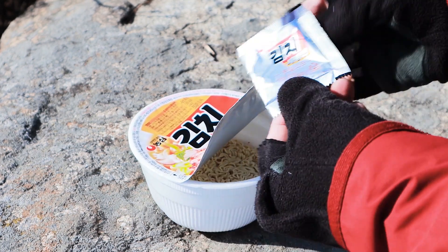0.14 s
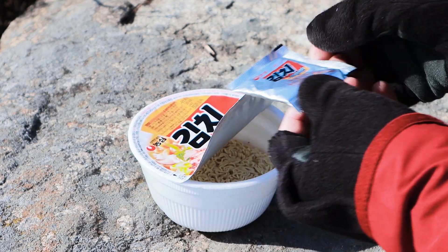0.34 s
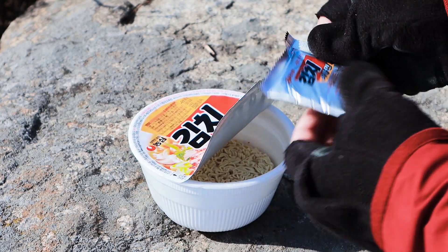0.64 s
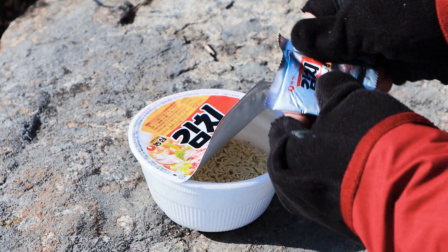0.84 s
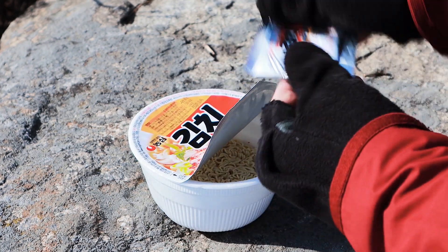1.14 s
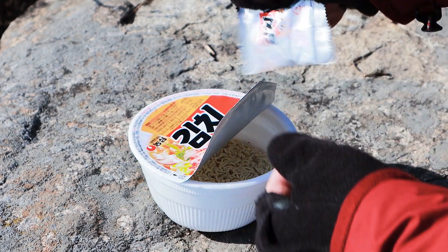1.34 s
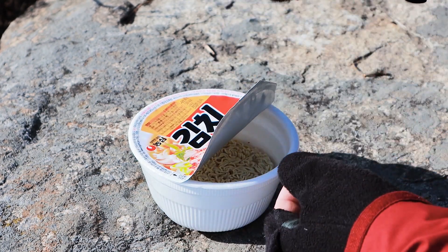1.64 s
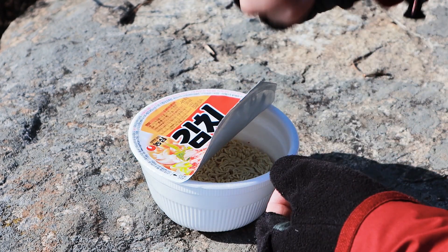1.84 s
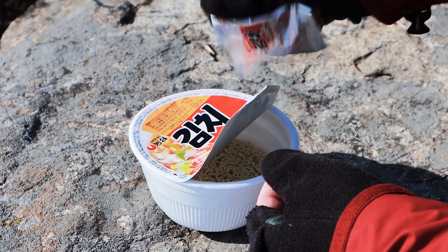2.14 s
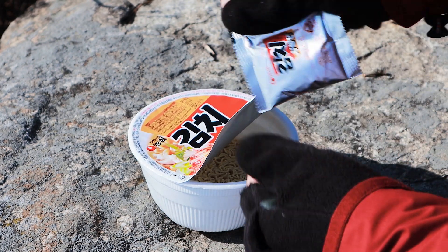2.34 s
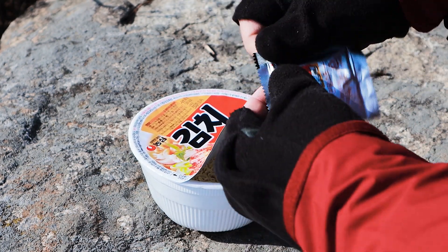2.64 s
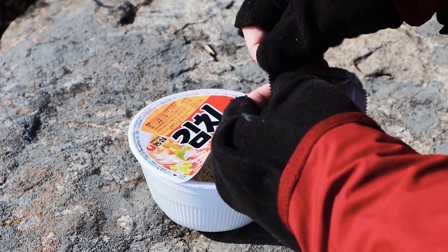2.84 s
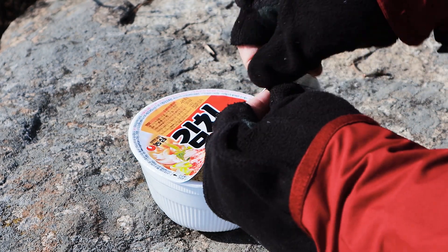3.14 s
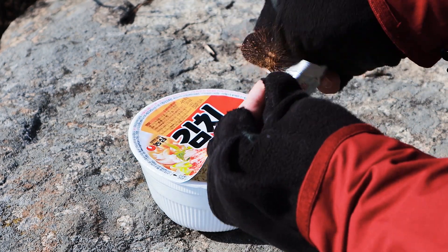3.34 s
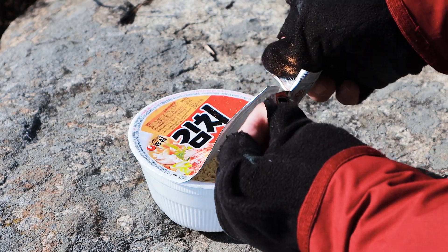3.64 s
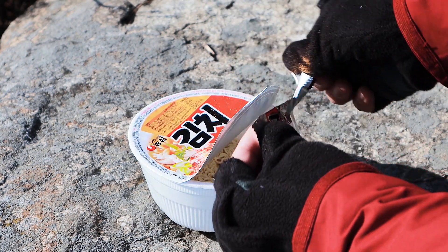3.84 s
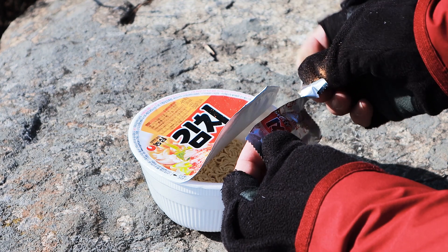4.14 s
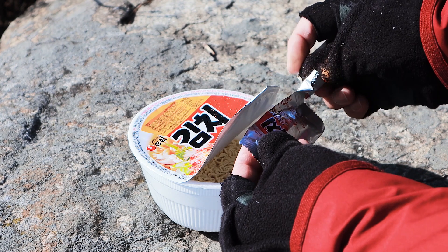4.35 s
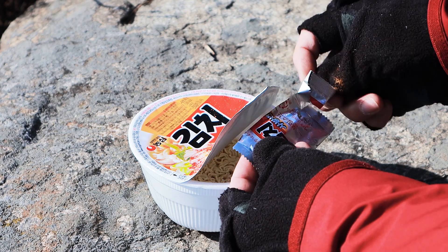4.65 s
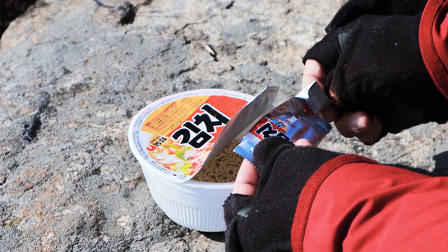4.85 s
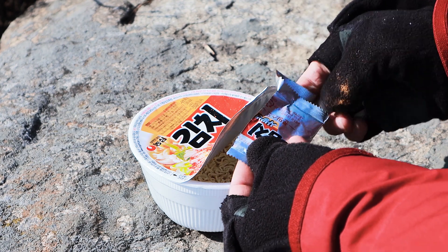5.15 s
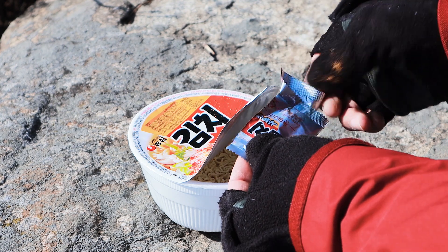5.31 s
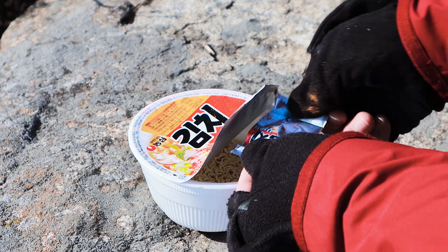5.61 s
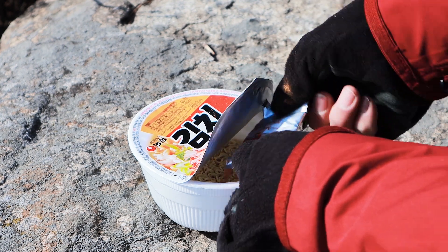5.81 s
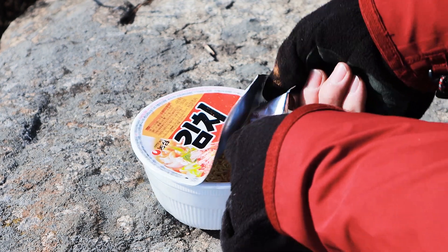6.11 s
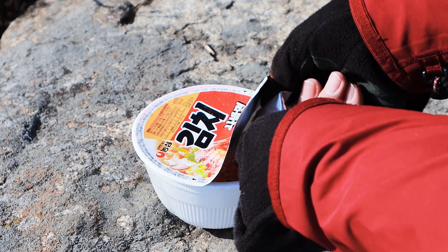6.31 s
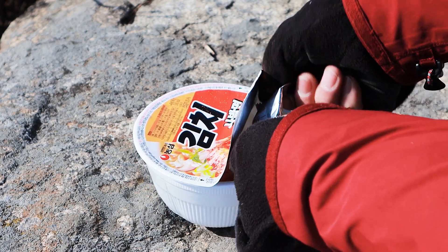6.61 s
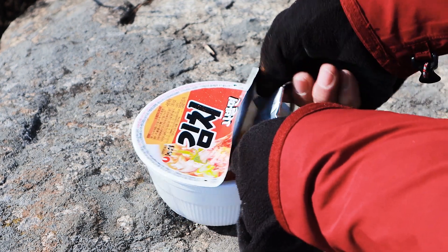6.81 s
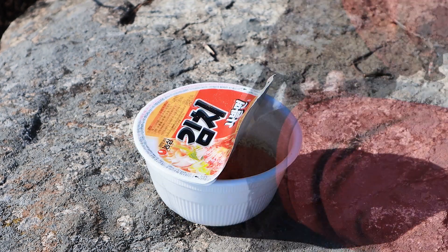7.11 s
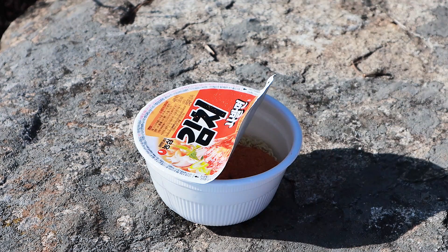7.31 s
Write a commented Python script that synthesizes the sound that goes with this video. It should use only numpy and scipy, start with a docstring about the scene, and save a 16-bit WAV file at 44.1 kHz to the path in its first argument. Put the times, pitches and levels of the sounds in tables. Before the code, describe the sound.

Foil sachet crinkles close up, is shaken in sharp powdery slaps, tears in small snaps, then powder hisses into a hollow foam cup outdoors.

```python
"""Foil crinkles close to the microphone: gloved hands handle a seasoning sachet over a foam noodle cup on open rock.
Flipping creases crackle and snap, the powder slaps inside as the sachet is shaken, and its top tears off in
small snaps. Powder then hisses along the foil and rings the cup's resonances. Gusts of low wind noise, a faint
outdoor hiss and one faint falling whistle lie under it. The sounds are made from shaped noise, clicks and
soft pushes, with a sine for the whistle."""
import sys
import numpy as np
from scipy import signal
from scipy.fft import rfft, irfft, next_fast_len
from scipy.io import wavfile
from scipy.ndimage import uniform_filter1d

SR = 44100
rng = np.random.default_rng(int(sys.argv[2]) if len(sys.argv) > 2 else 0)


def store_pcm(level_fs):
    """Save levels as 16-bit WAV."""
    pcm = np.round(np.clip(level_fs, -1, 1) * 32767).astype(np.int16)
    wavfile.write(sys.argv[1], SR, np.atleast_2d(pcm).T)


N = 329427  # samples
TIME = np.arange(N) / SR  # seconds
TOP_HZ = 15900  # upper limit of filter tuning and of the recorder

# The colour of the sachet's crackle and slap beside the rock: a low hump near 240 Hz, with notches near 2.1,
# 4.9 and 6.8 kHz. Each row: frequency in Hz, relative level in dB.
SACHET_SPECTRUM = [(120, -13), (240, 8.5), (400, 4.5), (650, 2.5), (1060, -4), (1520, -0.5), (2060, -7),
                   (2900, -0.5), (4240, -3), (4860, -9.5), (5680, -1.5), (6800, -13.5), (7800, -5),
                   (10000, -2.5), (13500, -6), (16000, -10)]
# The colour of glove rub and fine crinkles. Each row: frequency in Hz, relative level in dB.
RUSTLE_SPECTRUM = [(200, -9), (700, -3), (1500, 3.5), (2100, -4), (3000, -1.5), (4200, -1), (4900, -11),
                   (5800, -1.5), (7000, -9.5), (8000, -4.5), (9800, 0.5), (12500, -8.5), (16000, -14)]


def undb(db):
    """Decibels to gain."""
    return 10 ** (np.asarray(db) / 20)


def unit(x):
    """Scale to rms 1."""
    return x / np.sqrt(np.mean(x ** 2) + 1e-20)


def curve(rows):
    """Gain over time, from rows of seconds and dB."""
    return undb(np.interp(TIME, *np.transpose(rows)))


def add(out, start_s, x):
    """Mix a short sound in at a given time; whatever falls past the end is dropped."""
    i = max(int(start_s * SR), 0)
    out[i:i + len(x)] += x[:max(N - i, 0)]


def colour(x, points):
    """Shape a sound by a spectrum in Hz and dB, straight over log frequency; rms 1."""
    hz, db = np.transpose(points)
    n = next_fast_len(len(x), real=True)
    f = np.fft.rfftfreq(n, 1 / SR) + 1  # the 1 Hz offset avoids log(0)
    gain = undb(np.interp(np.log(f), np.log(hz), db))
    return unit(irfft(rfft(x, n) * gain, n)[:len(x)])


def resonance(x, hz, q):
    """Two-pole band-pass with gain 1 at the centre; Q is never below 0.1."""
    w = 2 * np.pi * min(hz, TOP_HZ) / SR
    a = np.sin(w) / (2 * max(q, .1))
    return signal.lfilter([a, 0, -a], [1 + a, -2 * np.cos(w), 1 - a], x)


def cut(x, hz, kind, order=2):
    """Smooth high-pass or low-pass."""
    return signal.sosfilt(signal.butter(order, min(hz, TOP_HZ), kind, fs=SR, output="sos"), x)


def walk(rate):
    """Smooth random wander through about `rate` new values a second; rms 1."""
    k = max(int(SR / rate), 1)
    steps = np.repeat(rng.standard_normal(N // k + 1), k)[:N]
    return unit(uniform_filter1d(steps, k))


def grains(rate, spread_db):
    """Random tiny impacts, about `rate` a second, of unequal size and either sign; rms 1."""
    hit = rng.random(N) < rate / SR
    sign = np.sign(rng.standard_normal(N))
    size = undb(spread_db * np.clip(rng.standard_normal(N), -2, 2))
    return unit(hit * sign * size)


def gesture(start_s, length_s, attack_s, release_s):
    """The samples around one hand movement, and its exponential attack, hold and release over them."""
    first = max(int(start_s * SR) - SR // 8, 0)
    span = slice(first, int((start_s + length_s) * SR) + SR // 5)
    t = TIME[span] - start_s
    return span, np.exp(np.minimum(t, 0) / attack_s - np.maximum(t - length_s, 0) / release_s)


def buckle(decay_s, rise_s=0.00006, tail_s=0.0066, tail_db=-19, crack=0.65):
    """One crease flips: a crack, a quick flutter of the film and a weak tail off hands and rock."""
    t = TIME[:SR // 40]
    flutter = np.exp(-t / decay_s) + undb(tail_db) * np.exp(-t / tail_s)
    x = np.tanh(rng.standard_normal(len(t))) * flutter * (1 - np.exp(-t / rise_s))
    x[SR // 4000] += crack  # a single-sample click, 0.25 ms in
    return x / np.linalg.norm(x)


def crackle(rate, spread_db, decay_s, low_hz, high_hz, q, count=200):
    """A set of facets, each with its own pitch, flipping at uneven gaps with uneven force; rms 1."""
    facets = [unit(resonance(buckle(decay_s), hz, q)) for hz in np.geomspace(low_hz, high_hz, count)]
    times = np.cumsum(rng.gamma(2, 1 / (2 * rate), int(rate * N / SR)))
    sizes = undb(spread_db * rng.random(len(times)) ** 2)  # squaring makes strong flips rarer
    choices = rng.integers(count, size=len(times))
    out = np.zeros(N)
    for at_s, size, facet in zip(times, sizes, choices):
        add(out, at_s, size * facets[facet])
    return unit(out)


def outdoors(wind_db=-1, gust_db=2.0, calm_db=-71, waver_db=1.2):
    """Wind buffets the microphone in gusts of low noise over a slowly wavering distant hiss."""
    # Gusts at the microphone. Each row: peak in seconds, level in dB before wind_db,
    # time constant of swell and fade in seconds.
    gusts = [(.89, -52.5, 0.26), (1.36, -57, 0.22), (2.05, -57, 0.092), (2.8, -59, 0.23), (3.32, -49, 0.14),
             (3.68, -55, 0.13), (4.0, -55.5, 0.13), (4.89, -49, 0.26), (5.19, -48.5, 0.33),
             (5.72, -53, 0.28), (6.7, -62, .15), (7.4, -68, .3)]
    # The open-air hiss. Each row: time in seconds, level in dB before the waver.
    air_level = [(0, -58.5), (2.5, -63.5), (3.5, -60), (4.5, -60.5), (5.4, -63.5), (6.85, -57.5),
                 (7.1, -50.5), (7.3, -50), (7.47, -45.5)]
    # Colour of hiss, then of wind. Each row: frequency in Hz, relative level in dB.
    air_spectrum = [(100, 4.5), (250, 2), (600, 2), (1000, -5.5), (1500, -2.5), (2100, -8), (4000, -9),
                    (7000, -11.5), (10000, -9), (16000, -17)]
    wind_spectrum = [(20, -1), (45, -1.5), (90, -6), (160, -13.5), (300, -23.5), (800, -76)]
    eddies, waver = walk(20), walk(6)
    force = undb(calm_db)
    for at_s, db, fade_s in gusts:
        gust = undb(db) * np.exp(-np.abs(TIME - at_s) / fade_s)
        force = np.maximum(force, gust)  # the strongest gust counts
    wind = colour(rng.standard_normal(N), wind_spectrum) * force * undb(wind_db + gust_db * eddies)
    air = colour(rng.standard_normal(N), air_spectrum) * curve(air_level) * undb(waver_db * waver)
    return wind + air


def whistles(decay_s=0.092):
    """A faint gliding whistle, like a distant bird: a decaying sine whose pitch slides evenly."""
    # Glides; a row that starts past the end stays silent. Each row: start in seconds, length in seconds,
    # start pitch in Hz, end pitch in Hz, level in dB before the decay.
    glides = [(7.115, .093, 1490, 1240, -50), (8.5, .075, 7200, 10750, -49)]
    out = np.zeros(N)
    for at_s, length_s, start_hz, end_hz, db in glides:
        t = TIME[:int(length_s * SR)]
        pitch = np.linspace(start_hz, end_hz, len(t))
        tone = unit(np.sin(2 * np.pi * np.cumsum(pitch) / SR))
        fade = np.exp(-t / decay_s) * signal.windows.tukey(len(t), .15)
        add(out, at_s, undb(db) * tone * fade)
    return out


def cup(x):
    """The air and wall of the cup ring with whatever falls into it; rms 1."""
    # Resonances under the half-open lid. Each row: frequency in Hz, width in Hz, relative level in dB.
    modes = [(230, 45, -9), (320, 50, -8), (456, 42, 0), (635, 65, 0), (705, 65, -1), (890, 50, -1),
             (1010, 60, -6), (1260, 90, 1), (1530, 55, 0), (1750, 90, -4), (2250, 200, -13),
             (2900, 100, -9), (3700, 250, -11)]
    return unit(sum(undb(db) * resonance(x, hz, hz / width) for hz, width, db in modes))


def knocks(contact_s=0.0019, lowest_hz=420, grit_db=-16):
    """The sachet bumps the cup with a short soft push and the cup answers with a hollow note."""
    # Blows on the cup. Each row: time in seconds, level in dB over the first 20 ms.
    blows = [(2.044, -26.5), (2.054, -32), (4.362, -55), (5.014, -54), (5.091, -49.5), (5.268, -59.5),
             (5.712, -43), (6.067, -46), (6.222, -42), (6.982, -33), (7.089, -50.5)]
    out, t = np.zeros(N), TIME[:SR // 8]
    for at_s, db in blows:
        grit = undb(grit_db) * rng.standard_normal(len(t)) * np.exp(-t / (10 * contact_s))
        push = np.exp(-t / contact_s) + grit
        note = cup(cut(push, lowest_hz, "high", order=3))
        add(out, at_s, undb(db) * note / np.std(note[:SR // 50]))
    return out


def pouring(cup_db=-2, scrape_db=-6, slide_db=-1, scrape_q=3.5, catch_db=3, dull_hz=3500, lowest_hz=250):
    """Powder hisses along the foil; lumps and the sachet's edge scrape the noodles and ring the cup."""
    # Spills into the cup. Each row: start in seconds, length in seconds, level in dB before the layer balance,
    # relative level of the sliding hiss in dB before slide_db, scrape centre in Hz.
    spills = [(5.701, .025, -36, -5.5, 920), (5.754, 0.079, -39, -4, 895), (5.9, 0.017, -41, -7, 880),
              (5.926, 0.041, -46, -2.5, 805), (5.994, 0.052, -42.5, -1.5, 1080),
              (6.052, 0.091, -51, -3.5, 585), (6.194, 0.0036, -42.5, -25, 1150),
              (6.215, 0.01, -29.5, -3, 1380), (6.248, 0.027, -40, -17, 770), (6.302, 0.157, -55.5, -3, 700),
              (6.515, .022, -44.5, -26, 785), (6.559, 0.032, -40, -3, 1290),
              (6.619, 0.0028, -41.5, -20, 1040), (6.68, 0.0075, -40.5, -21, 1360),
              (6.717, 0.061, -46.5, 0, 1250), (6.847, 0.015, -36, -16, 1090),
              (6.887, 0.046, -31, -11, 1120), (6.972, 0.011, -41, 4.5, 1400)]
    # Colour of the sliding hiss. Each row: frequency in Hz, relative level in dB.
    slide_spectrum = [(800, -23), (2500, -4.5), (4100, -2.5), (5000, -6), (6100, -4), (7100, -7),
                      (8000, -4.5), (9700, -1), (12000, -4.5), (16000, -13)]
    lumps = crackle(rate=220, spread_db=10, decay_s=.001, low_hz=550, high_hz=2100, q=24)
    falling = grains(rate=1100, spread_db=2)
    falling = cut(cut(falling, lowest_hz, "high"), dull_hz, "low")
    slide = crackle(rate=380, spread_db=16, decay_s=.0008, low_hz=2500, high_hz=14000, q=1.5)
    slide = colour(slide, slide_spectrum)
    catch = walk(70)
    spurts = unit(undb(catch_db * np.tanh(catch)))  # the flow catches and lets go
    out = np.zeros(N)
    for start_s, length_s, db, hiss_db, hz in spills:
        span, swell = gesture(start_s, length_s, attack_s=0.0039, release_s=0.012)
        flow = swell * spurts[span]
        patter = cup(falling[span] * flow)  # the cup rings on after each spurt
        scrape = unit(resonance(lumps[span] * flow, hz, scrape_q))
        hiss = unit(slide[span] * flow)
        spill = undb(cup_db) * patter + undb(scrape_db) * scrape + undb(hiss_db + slide_db) * hiss
        out[span] += undb(db) * np.sqrt(np.mean(swell ** 2)) * spill
    return out


def handling(resting_db=-63):
    """How hard the fingers rub the foil and how hard they crease it, as gains: the firmest grip counts."""
    # Grips of the fingers. Each row: start in seconds, length in seconds, rubbing level in dB,
    # creasing level in dB relative to the rubbing, both before the layer balance.
    grips = [(0, .22, -48.5, -1.5), (0.296, 0.019, -58, 7.5), (0.398, 0.051, -53, 1.5),
             (0.547, 0.043, -50, -4.5), (.6, .46, -61, 0), (0.774, 0.22, -56, 5),
             (1.043, 0.22, -53.5, -0.5), (1.301, 0.28, -45, -4), (1.51, .9, -49, -3.5),
             (2.427, 0.069, -43.5, 4.5), (2.513, 0.29, -68, 11.5), (2.685, 0.02, -50, 2),
             (2.944, 0.21, -57.5, -8), (3.187, 0.2, -54.5, 1), (3.346, .135, -50, -1),
             (3.464, 0.17, -54.5, -5.5), (3.83, 0.18, -56, -7.5), (4.19, .05, -57, -2),
             (4.606, 0.091, -64, 2), (4.851, 0.11, -56.5, 2), (4.982, 0.18, -57.5, -10),
             (5.439, 0.08, -55, -22), (5.616, 1.14, -56, -5.5), (6.413, 0.021, -50.5, 10),
             (6.988, 0.064, -54, 2)]
    rubbing = np.full(N, undb(resting_db))  # between grips the glove barely moves on the foil
    creasing = np.zeros(N)
    for start_s, length_s, db, crease_db in grips:
        span, swell = gesture(start_s, length_s, attack_s=0.0087, release_s=0.015)
        rubbing[span] = np.maximum(rubbing[span], undb(db) * swell)
        creasing[span] = np.maximum(creasing[span], undb(db + crease_db) * swell)
    return rubbing, creasing


def rustling(crinkle_db=-1, rub_db=-3, slip_db=2, crease_db=0):
    """Small creases and fine crinkles over the catching, slipping rub of glove on foil."""
    crinkles = crackle(rate=240, spread_db=18, decay_s=.0008, low_hz=1400, high_hz=13000, q=1.5)
    catch = walk(90)
    rub = undb(slip_db * catch) * rng.standard_normal(N)
    creases = crackle(rate=48, spread_db=10, decay_s=.001, low_hz=1900, high_hz=5000, q=.8)
    rubbing, creasing = handling()
    crinkling = np.sqrt(rubbing * creasing)  # crinkles need both sliding and bending
    return (rubbing * undb(rub_db) * colour(rub, RUSTLE_SPECTRUM)
            + crinkling * undb(crinkle_db) * colour(crinkles, RUSTLE_SPECTRUM)
            + creasing * undb(crease_db) * colour(creases, SACHET_SPECTRUM))


def shaking(powder_db=-10, gain_db=-3.5):
    """Powder slams into the end of the sachet and crumples the foil; each throw has its own lowest pitch."""
    # Powder thrown to and fro. Each row: start in seconds, length in seconds, level in dB before gain_db,
    # high-pass corner in Hz.
    throws = [(0.484, 0.0043, -28.5, 518), (0.863, 0.012, -30, 550), (1.357, 0.035, -34.5, 650),
              (1.454, 0.035, -23, 1100), (1.59, 0.028, -24, 1000), (1.652, .034, -17.5, 920),
              (1.781, 0.022, -24, 1120), (1.844, 0.026, -19.5, 950), (1.962, 0.015, -22, 950),
              (2.023, 0.0055, -23.5, 750), (2.041, .018, -20, 350), (2.187, 0.014, -26, 900),
              (2.238, 0.031, -21.5, 850), (2.343, 0.045, -27.5, 546)]
    foil = crackle(rate=420, spread_db=15, decay_s=.0007, low_hz=1200, high_hz=11500, q=2.2)
    powder = unit(resonance(grains(rate=9000, spread_db=3), 3000, .3))
    slap = colour(foil + undb(powder_db) * powder, SACHET_SPECTRUM)
    out = np.zeros(N)
    for start_s, length_s, db, lowest_hz in throws:
        span, swell = gesture(start_s, length_s, attack_s=0.007, release_s=0.0059)
        throw = unit(cut(slap[span] * swell, lowest_hz, "high", order=1))
        out[span] += undb(db + gain_db) * np.sqrt(np.mean(swell ** 2)) * throw
    return out


def snaps(dull_hz=12500, lowest_hz=300, gain_db=0):
    """Single loud creases and steps of the tear; the size of each facet sets its ring."""
    # Creases snapping over. Each row: time in seconds, level in dB over the first 5 ms, ring in Hz,
    # sharpness Q (no unit, held to at least 0.1).
    creases = [(0.0219, -33, 2800, 0.26), (0.0314, -45, 6400, .35), (0.093, -30, 6640, .8),
               (0.1072, -36, 3500, 1.8), (0.119, -40, 3800, 1), (.1478, -34.5, 3430, 2),
               (.171, -30, 9000, 2.7), (0.2075, -34.5, 8800, 0.7), (0.2152, -36.5, 8700, 0.24),
               (0.2681, -42, 3900, 0.14), (0.301, -46, 2600, 1.3), (.415, -39, 2870, 2.7),
               (.421, -34.5, 3880, 0.31), (0.5129, -38, 3930, .7), (.5597, -32, 11000, 0.085),
               (0.5687, -36.5, 2880, 1.9), (.627, -51, 3800, 0.27), (0.743, -43, 2820, 1),
               (0.7998, -41, 2650, 2.2), (.87, -26, 2640, 0.56), (0.8894, -34.5, 3300, .4),
               (.928, -37, 2040, 0.26), (.9659, -34, 2740, 4.5), (1.092, -35, 2250, 3),
               (1.0987, -36.5, 1990, 1.9), (1.142, -32.5, 3150, 1.9), (1.1658, -38, 1890, .7),
               (1.19, -33, 2970, 1.5), (1.2074, -26.5, 2940, 0.89), (1.214, -28.5, 2500, 0.63),
               (1.2213, -32.5, 4500, 0.4), (1.255, -31.5, 3230, .4), (1.3092, -34.5, 4140, 0.67),
               (1.3966, -28, 12000, 1.6), (1.4027, -30, 2870, 1.1), (1.48, -23, 2180, 1.6),
               (1.5236, -29.5, 2640, 0.66), (1.5785, -25, 8200, 0.18), (1.6089, -26.5, 5700, .3),
               (1.6787, -28, 3140, 0.52), (1.739, -31, 2390, 1.6), (1.7576, -29, 2820, 0.52),
               (1.7634, -25, 2660, 1.5), (1.8317, -25.5, 2600, 0.19), (1.9179, -29.5, 2340, 1.2),
               (1.9443, -25, 5340, .3), (2.1381, -29.5, 2470, 1), (2.1557, -29, 2530, 0.091),
               (2.1667, -26.5, 3000, 0.65), (2.4257, -38, 2560, 2), (2.4387, -30.5, 2580, 0.86),
               (2.4496, -29.5, 3040, 0.13), (2.4614, -31, 3800, 1.7), (2.482, -33.5, 3340, 1.9),
               (2.4914, -31, 2200, 0.32), (2.5879, -35.5, 4450, 0.87), (2.62, -47, 1900, 3.3),
               (2.67, -37.5, 2500, .6), (2.687, -35, 2580, 0.16), (2.6934, -33, 1440, 0.23),
               (2.8208, -38.5, 1140, 0.39), (2.8364, -27.5, 4650, 0.23), (2.996, -40, 1870, 0.59),
               (3.1964, -36.5, 2530, 0.34), (3.2076, -40, 4500, 0.73), (3.215, -35, 3150, 0.46),
               (3.258, -44, 1290, 5.2), (3.3093, -41, 2630, 5), (3.3285, -34.5, 3600, 0.51),
               (3.361, -37, 4800, 0.49), (3.4039, -33.5, 3700, .5), (3.423, -27.5, 7200, 0.75),
               (3.4533, -34.5, 11000, 0.25), (3.7874, -36.5, 5100, 6.1), (3.833, -39, 5100, 1.6),
               (3.861, -38, 8000, 1.1), (3.8999, -30, 8200, 0.78), (3.91, -38.5, 5300, 0.33),
               (4.1179, -48, 1810, 0.63), (4.1862, -45, 2500, 0.99), (4.363, -43.5, 1330, 0.23),
               (4.6517, -38.5, 2450, 0.1), (4.783, -38, 6200, 0.19), (4.8709, -42, 4400, 1.2),
               (4.9015, -27.5, 6350, 1.6), (5.0131, -28.5, 6540, 1.2), (5.0713, -31.5, 8650, 0.9),
               (5.089, -29.5, 4240, 0.089), (5.1946, -49.5, 1150, 0.29), (5.225, -50.5, 1960, 1.6),
               (5.27, -48, 1170, 0.17), (5.6819, -42, 5000, .4), (6.006, -37.5, 2500, 0.16),
               (6.0558, -30.5, 1240, .25), (6.179, -38, 950, 1.6), (6.316, -37, 3960, 0.13),
               (6.4033, -30.5, 2550, 0.26), (6.411, -46, 1900, .3), (6.4288, -35.5, 2360, 0.55),
               (6.6778, -33.5, 1257, 20), (6.7185, -35.5, 3630, 1.5), (6.768, -34, 3400, 2.7),
               (6.9815, -21.5, 1060, 0.067), (7.096, -34, 2840, 0.088), (7.401, -33, 680, 0.75)]
    out = np.zeros(N)
    for at_s, db, hz, q in creases:
        decay_s = .0012 * 2 ** ((db + 33) / 20)  # a harder snap flutters longer: 1.2 ms at -33 dB
        ring = resonance(buckle(decay_s), hz, q)
        x = cut(cut(ring, dull_hz, "low"), lowest_hz, "high", order=1)
        add(out, at_s, undb(db + gain_db) * x / np.std(x[:SR // 200]))
    return out


def scene():
    """Everything at the one microphone, from the open air to the close foil."""
    mix = outdoors() + whistles() + knocks() + pouring() + rustling() + shaking() + snaps()
    return mix[None]


def record(dry):
    """The recorder cuts the top with a steep low-pass."""
    return signal.sosfilt(signal.ellip(10, .2, 80, TOP_HZ, fs=SR, output="sos"), dry)


dry = scene()
out = record(dry)
store_pcm(out)
```